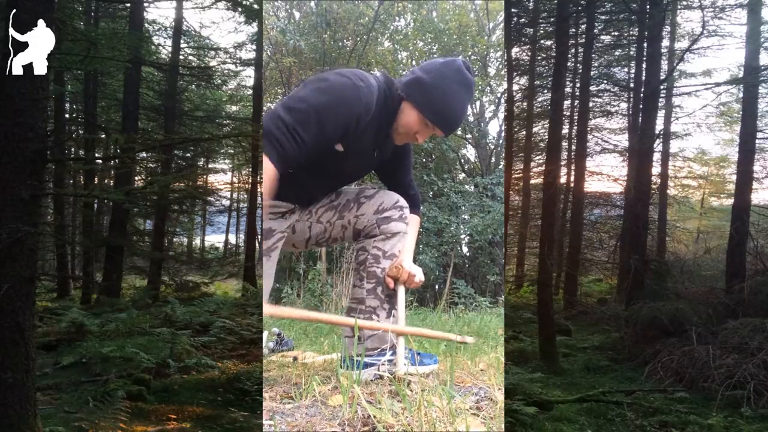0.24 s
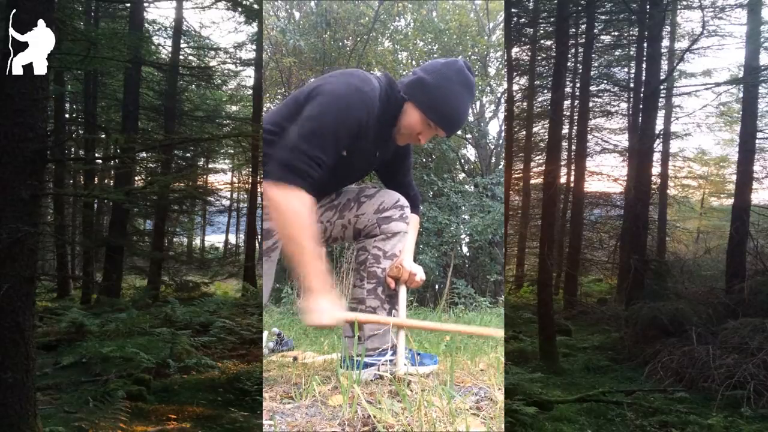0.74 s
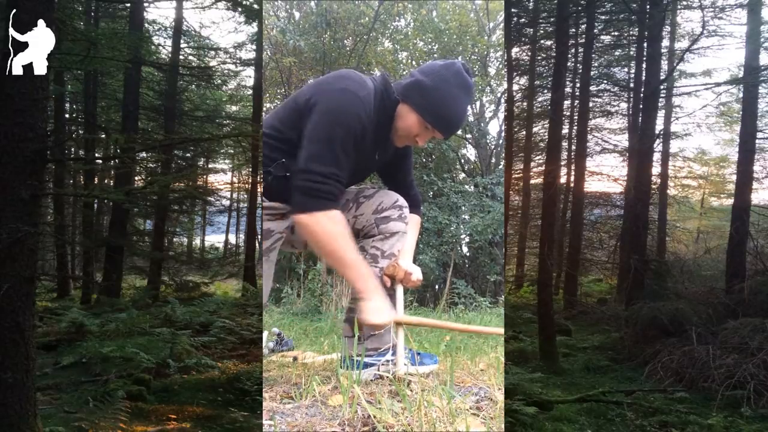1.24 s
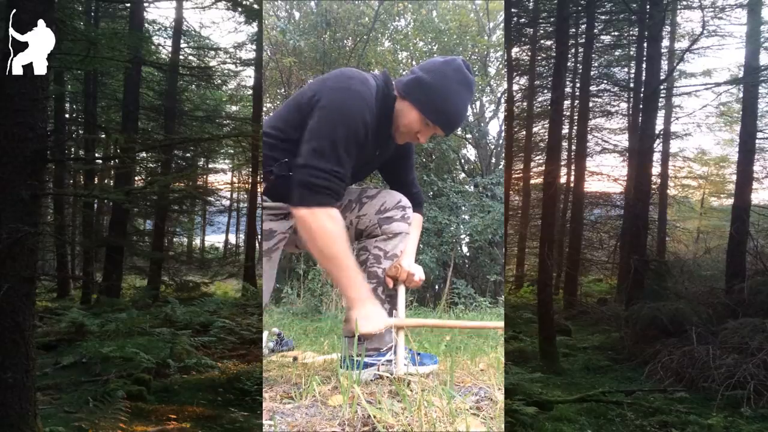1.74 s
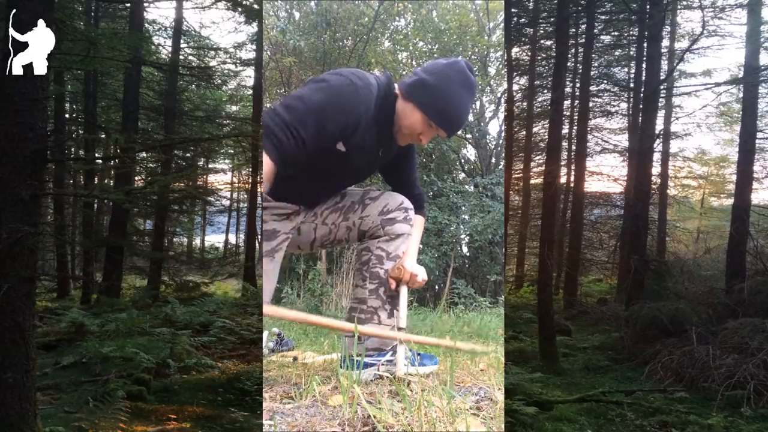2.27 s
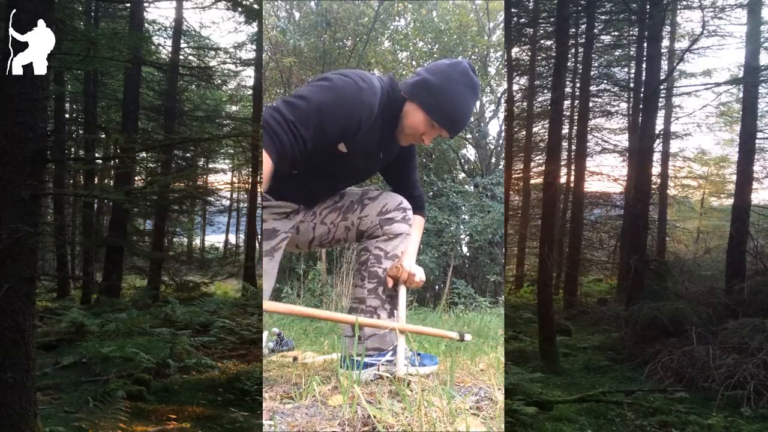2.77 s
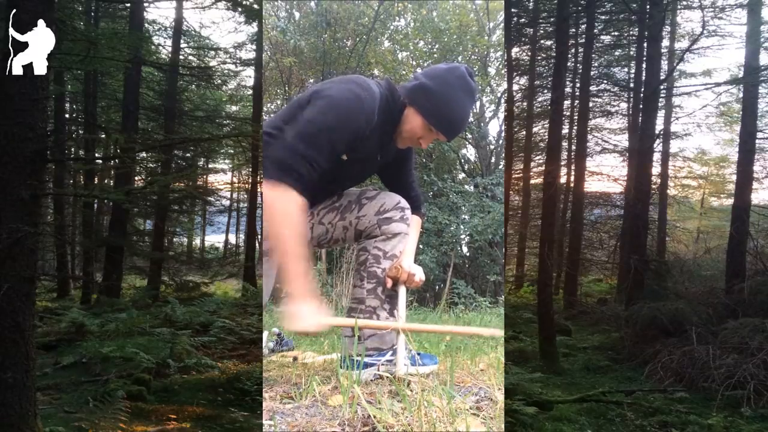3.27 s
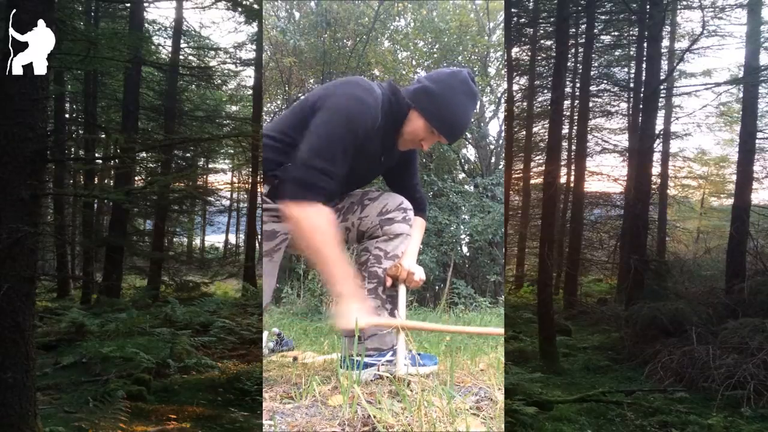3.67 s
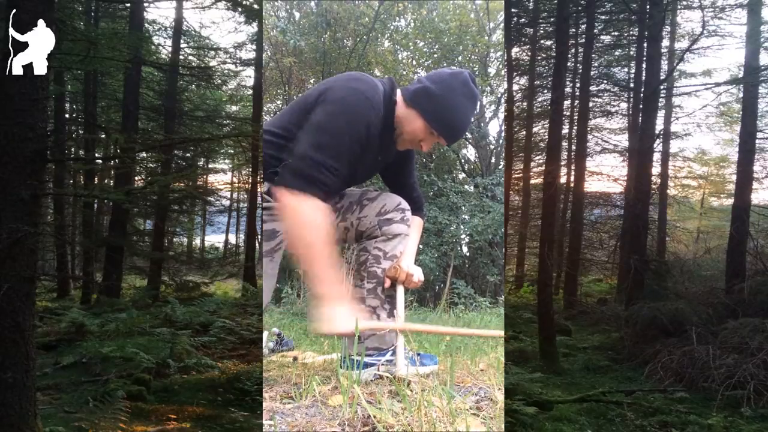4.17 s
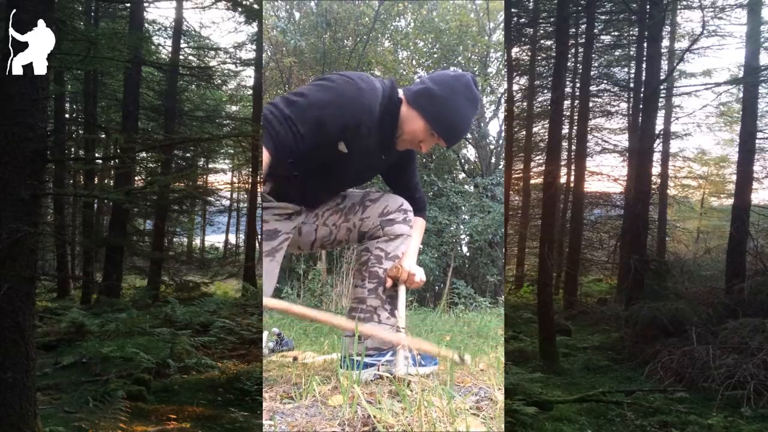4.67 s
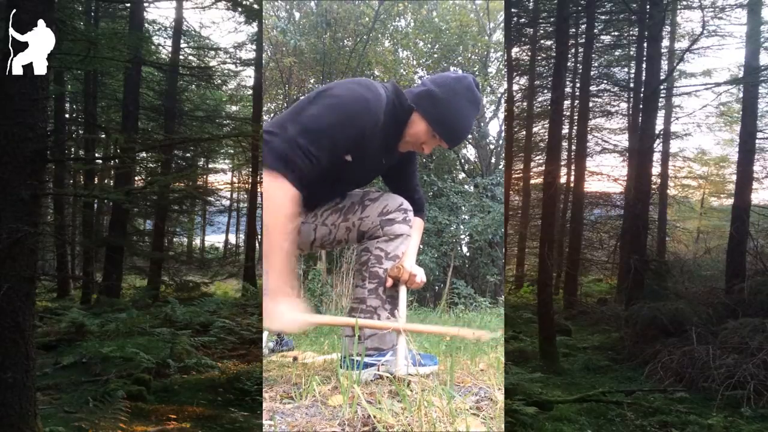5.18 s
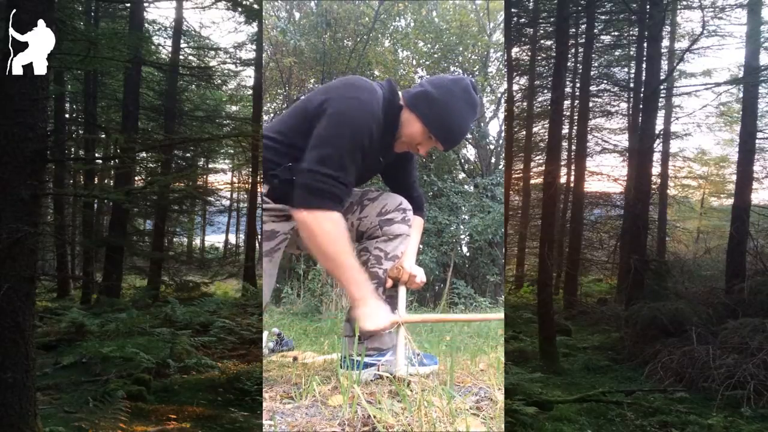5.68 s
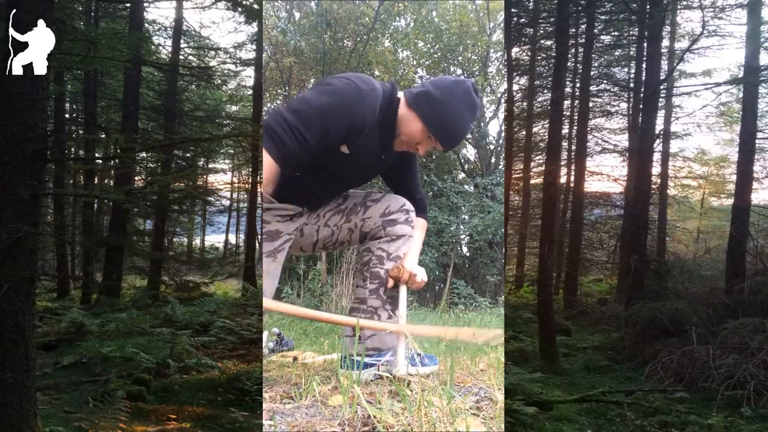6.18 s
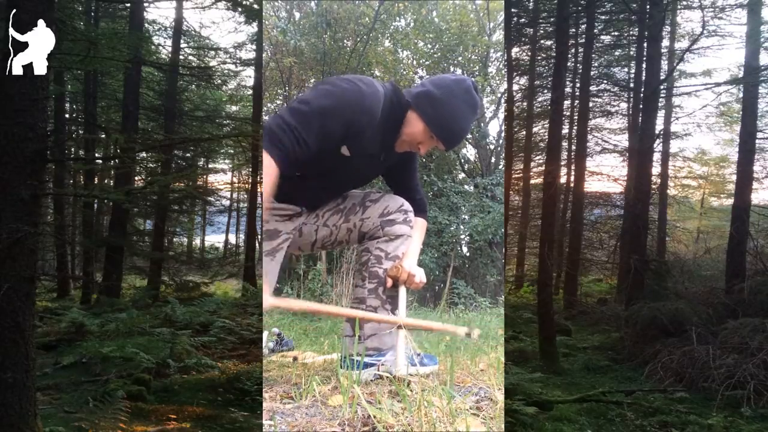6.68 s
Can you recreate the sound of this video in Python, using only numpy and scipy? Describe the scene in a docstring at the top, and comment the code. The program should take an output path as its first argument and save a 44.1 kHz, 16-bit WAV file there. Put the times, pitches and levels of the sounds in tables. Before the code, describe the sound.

Close outdoors, a bow drill saws about five strokes a second. Gritty wooden rasps alternate with short piercing squeals, some chattering, frequent in the first half. Dry knocks land mostly at the turns, with tiny cord ticks. Later the rasp grows stronger and squeals become rare. Trees return a brief bright echo over a faint airy wash and low hum.

```python
"""A bow drill in a forest clearing, over a faint hum. A lone squeal opens it, the tip grabbing a swinging
spindle. Then the bow saws to and fro five strokes a second: grit clicks rasp in the socket, and squeals near
1.9 kHz, some with chatter, come often until 3.8 s. Wood knocks ring, mostly at the turns; the cord gives puffs
of treble. Trees send back a short bright echo throughout. The background noise rises after 4 s, when squeals
are rarer; the last squeal comes at 6.1 s, and rasping and knocks carry on to the end."""
import sys
import numpy as np
from scipy import signal
from scipy.fft import rfft, irfft, next_fast_len
from scipy.io import wavfile
from scipy.ndimage import uniform_filter1d, minimum_filter1d

SR = 44100
rng = np.random.default_rng(int(sys.argv[2]) if len(sys.argv) > 2 else 0)


def store_wav(level_fs):
    """Save 16-bit WAV to argv[1]."""
    pcm = np.round(np.clip(np.atleast_2d(level_fs), -1, 1) * 32767)
    wavfile.write(sys.argv[1], SR, pcm.T.astype(np.int16))


def invert_db(x):
    """Field ratio 10**(x/20) for x, a level in decibels (scalar or array-like)."""
    u = np.asarray(x, float) / 20
    return 10 ** u


N = 305172  # length in samples
T = np.arange(N) / SR


def colour(x, points):
    """Shape a spectrum by (f/Hz, level/dB) points, joined by straight lines over log frequency."""
    hz, db = np.transpose(points)
    size = next_fast_len(len(x))
    f = np.arange(size // 2 + 1) * SR / size + 1
    gain = invert_db(np.interp(np.log(f), np.log(hz), db))
    return irfft(rfft(x, size) * gain, size)[:len(x)]


def unit(x):
    """Scale a sound to rms 1."""
    return x / np.sqrt(np.mean(x ** 2))


def walk(rate):
    """A random wandering: levels held 1 / rate s and smoothed twice; spread near 1."""
    k = int(SR / rate)
    held = np.repeat(rng.standard_normal(N // k + 1), k)
    return 1.345 * uniform_filter1d(uniform_filter1d(held, k), k)[:N]


def band(x, hz, width):
    """A resonance applied twice, so that little is left on either side of it; rms 1."""
    peak = signal.iirpeak(hz, hz / width, fs=SR)
    return unit(signal.lfilter(*peak, signal.lfilter(*peak, x)))


def shake(x):
    """A small board radiates little low sound."""
    return signal.sosfilt(signal.butter(6, 520, "high", fs=SR, output="sos"), x)


def add(out, s, sound):
    """Mix a sound in at s seconds."""
    i = int(s * SR)
    out[i:i + len(sound)] += sound[:len(out) - i]


# colour of the outdoor wash: (f/Hz, relative level/dB)
WASH_COLOUR = [(20, -57), (40, -13), (80, -18.5), (150, -17), (320, -25.5), (900, -23), (2500, -28.5),
               (6000, -42), (15000, -46)]
# loudness of the wash over time: (t/s, level/dB)
WASH_LEVEL = [(0, -58.5), (2, -59), (3.8, -55.5), (4.6, -49), (6.92, -50.5)]
# low distant tones: (f/Hz, level/dB before wavering)
HUM_TONES = [(65, -62), (97, -63)]


def air():
    """Faint outdoor wash of coloured noise, and a low hum of sines wavering in level and phase."""
    swell = invert_db(1.2 * walk(4))
    wash = unit(colour(rng.standard_normal(N), WASH_COLOUR)) * swell
    hum = np.zeros(N)
    for hz, db in HUM_TONES:
        waver_db, drift = 2 * walk(6), .8 * walk(4)
        hum += invert_db(db + waver_db) * np.sin(2 * np.pi * hz * T + drift)
    return invert_db(np.interp(T, *np.transpose(WASH_LEVEL))) * wash + hum


# colour of what the trees send back: (f/Hz, gain/dB)
TREE_COLOUR = [(300, 9), (1000, -20), (1900, -14.5), (3000, -8), (3750, 3.5), (4500, -6), (5100, -3),
               (5800, 2), (6800, -3), (8000, -1.5), (14000, -9.5)]
ECHO_DB, ECHO_T60_S, ECHO_FADE_IN_S = -21.5, 0.35, 0.0076


def trees(x):
    """Scattered trunks return a decaying, treble-rich echo: the sound convolved with fading noise."""
    t = T[:SR]
    tail = rng.standard_normal(SR) * 1000. ** (-t / ECHO_T60_S) * np.clip(t / ECHO_FADE_IN_S, 0, 1)
    tail = colour(tail / np.sqrt(np.sum(tail ** 2)), TREE_COLOUR)
    # fast random flutter blurs the echo of every tone into a breathy band
    fluttered = x * (1 + 1.3 * walk(900))
    return invert_db(ECHO_DB) * signal.fftconvolve(fluttered, tail)[:N]


# the cord creeps over the spindle in even runs:
# (t/s of loudest tick, level/dB before colour and boost, gap/ms, loss/dB per tick before it, and after it)
CREEPS = [(0.3208, -27.5, 13.4, 6.5, 7.1), (0.7503, -16.5, 14.4, 24, 15), (1.642, -22.5, 13.5, 30, 12),
          (2.836, -23, 14, 12, 30), (3.1955, -21.5, 11, 28, 4.9), (3.9619, -20.5, 10.2, 7.5, 3),
          (4.4102, -19, 11.6, 3, 9), (4.7741, -19.5, 9.8, 13, 4.5), (4.928, -22.5, 8.2, 14, 30),
          (4.9661, -24, 9, 6, 30), (5.1791, -11.5, 9.8, 4.5, 4), (5.9523, -14.5, 10.6, 4, 30),
          (6.3042, -28.5, 9.7, 30, 7.5), (6.5131, -19, 8.8, 7, 30)]
# lone ticks: (t/s, level/dB before colour and boost)
LONE_TICKS = [(0.1979, -33), (0.6652, -31), (1.0793, -33.5), (1.5126, -24), (1.5674, -15), (3.32, -18),
              (3.6063, -22.5), (3.6418, -27), (4.1524, -26), (5.2515, -28), (5.581, -29), (5.7243, -20),
              (6.1, -16.5), (6.704, -16.5), (6.7442, -22), (6.818, -27.5), (6.8816, -21)]
# colour of every tick: (f/Hz, gain/dB before the boost)
TICK_COLOUR = [(1500, -14.5), (3500, -9), (5800, -3.5), (7500, -13.5), (10000, -29.5), (16000, -20)]


def cord():
    """Puffs of treble noise that peak after 0.6 ms: runs, lone ticks and faint ones at random."""
    out = np.zeros(N)
    ticks = []
    for s, db, gap_ms, before, after in CREEPS:
        for k in range(-3, 4):
            loss_db = abs(k) * (before if k < 0 else after)
            ticks.append((s + k * gap_ms / 1000, db - loss_db))
    ticks += LONE_TICKS
    # faint ticks, 0 to 8 dB above the faintest
    ticks += [(s * N / SR, -42 + 8 * size) for s, size in rng.random((40, 2))]
    rise = T[:200] / .0006
    puffs = rng.standard_normal((len(ticks), 200)) * rise * np.exp(1 - rise)
    for (s, db), puff in zip(ticks, puffs):
        add(out, s, invert_db(db) * puff)
    return invert_db(7.5) * colour(out, TICK_COLOUR)


# modes of the struck bow and spindle: (f/Hz before detuning, level/dB before each blow's tilt, t60/s)
BODY = [(168.5, -5, 0.04), (416.6, -1.5, 0.044), (580, -8, 0.024), (719, -1, 0.013), (974, -5.5, 0.015),
        (1341, -1.5, 0.017), (1870, -2.5, 0.018), (2484, -3, 0.011), (3910, 3.5, 0.0046),
        (4815, 1.5, 0.006), (5930, -5.5, 0.01), (7670, -10.5, 0.0043), (10430, -17, 0.006)]


def ring(db, chance):
    """One blow into the modes of the wood, peak 1; where it lands sets each one's strength, pitch and phase."""
    t = T[:4096]
    spot_db, detune, phase = (chance * [2.5, .03, 1.2]).T
    hz, mode_db, t60 = np.transpose(BODY)[:, :, None]
    swing = np.sin(2 * np.pi * hz * (1 + detune[:, None]) * t + phase[:, None])
    fading = swing * 1000. ** (-t / t60)
    y = invert_db(mode_db[:, 0] + db + spot_db) @ fading
    # the contact takes a moment to build
    y = y * (1 - np.exp(-(t / .0004) ** 2))
    return y / np.abs(y).max()


# wood on wood, mostly at the turns: (t/s, peak level/dB before the bass cut, thud/dB, snap/dB)
KNOCKS = [(0.2209, -9, -26, 0), (0.3138, -28, 4, -18), (0.3951, -17.5, -5, -0.5), (0.6796, -9.5, -12.5, 0),
          (0.7523, -10.5, -5, -28), (0.95, -25.5, -40, -11), (1.1383, -16.5, -16, 2),
          (1.1832, -11, -16, -17), (1.2323, -10, -10, -2.5), (1.253, -10.5, -17, -1), (1.289, -16, -8, -3),
          (1.645, -29, -8, -10), (1.99, -16.5, -24, 2), (2.066, -6.5, -18.5, -0.5), (2.473, -20, -4, -4),
          (2.5181, -28, -1, -5), (2.8931, -23.5, -1.5, -2), (3.2309, 0, -23, 5), (3.3051, -7.5, -15, -15),
          (3.5987, -2.5, -21, 7), (3.6577, -23.5, -12, -1), (3.7136, -13, -16.5, -5.5),
          (3.997, -0.5, -22, 2), (4.07, -1, -15, 2.5), (4.1181, -0.5, -28, -0.5), (4.1231, -5.5, -5, 7.5),
          (4.4661, -29.5, 8, -8), (4.5135, -18, -2.5, -11), (4.6457, -28, -26, -5),
          (4.8446, -13, -5.5, -10), (5.0294, -26, -14, -9), (5.2021, -0.5, -16, 1),
          (5.2585, -9.5, -2.5, -4), (5.597, 1.5, -15.5, 3), (5.641, -15.5, -2.5, -4),
          (5.6843, -21, -3, -11), (5.966, -4, -15.5, -5.5), (6.0202, -27.5, 0, -1),
          (6.071, -19.5, -1, -5.5), (6.2, -27, -18, -13), (6.3644, -8.5, -20, -2.5), (6.4111, -8, -13, -1),
          (6.471, -17.5, 15, 4), (6.5174, -8, -13, -18), (6.6075, -22.5, -6, -19), (6.7622, 1, -16.5, -10),
          (6.8141, -16, -5, -13)]


def knocks():
    """Every blow rings the same modes of the wood, with its own weight, snap and edge."""
    out = np.zeros(N)
    chance = rng.standard_normal((len(KNOCKS), len(BODY), 3))
    octaves = np.log2(np.array(BODY)[:, 0] / 1000)  # above 1 kHz
    for (s, db, thud_db, snap_db), c in zip(KNOCKS, chance):
        edge_db = -7 + 0.4 * snap_db  # the top modes follow the snap
        tilt = np.interp(octaves, [-1.2, -.4, .4, .9, 1.4, 1.9], [thud_db, 0, 0, snap_db, snap_db, edge_db])
        add(out, s, invert_db(db) * ring(tilt, c))
    # thin sticks move little air in the deep bass
    return signal.sosfilt(signal.butter(2, 140, "high", fs=SR, output="sos"), out)


def resonate(x, peaks):
    """Sum of (f/Hz, width/Hz, level/dB) resonances, each coming and going in patches of its own."""
    out = np.zeros(N)
    for hz, width, db in peaks:
        patch_db = 3.5 * np.tanh(walk(150))
        out += invert_db(db + patch_db) * band(x, hz, width)
    return out


def arch(t, start, end, rise, fall):
    """Smooth rise to 1 about start and fall about end."""
    return .25 * (1 + np.tanh((t - start) / rise / 2)) * (1 - np.tanh((t - end) / fall / 2))


# bow strokes at full speed, pull and push in turn: (start t/s, end t/s, rasp level/dB before flutter)
STROKES = [(0.0, 0.029, -45.5), (0.155, 0.249, -39.5), (0.362, 0.455, -43), (0.6, 0.704, -37.5),
           (0.781, 0.895, -45.5), (1.022, 1.128, -45.5), (1.225, 1.325, -36.5), (1.466, 1.572, -30),
           (1.701, 1.784, -45.5), (1.929, 1.998, -35.5), (2.111, 2.195, -47), (2.318, 2.416, -31.5),
           (2.515, 2.63, -47.5), (2.739, 2.836, -40.5), (2.946, 3.024, -47), (3.15, 3.241, -31.5),
           (3.338, 3.445, -38.5), (3.538, 3.623, -32), (3.708, 3.804, -41), (3.925, 4.008, -29.5),
           (4.083, 4.211, -37.5), (4.313, 4.413, -28), (4.516, 4.605, -34), (4.705, 4.788, -28),
           (4.899, 4.985, -37), (5.103, 5.209, -26), (5.291, 5.387, -37.5), (5.486, 5.59, -29),
           (5.679, 5.767, -37), (5.86, 5.979, -30), (6.063, 6.159, -40), (6.253, 6.364, -30),
           (6.453, 6.549, -33.5), (6.651, 6.744, -28.5), (6.856, 6.94, -34)]
# board under the rubbing tip: (f/Hz, width/Hz of one filter pass, relative level/dB)
BOARD = [(802, 145, 16), (947, 405, 29.5), (1193, 220, 20), (1510, 240, 20), (2480, 370, 11.5)]
# how bite and hiss vary from stroke to stroke, the bite pitch drifting lower: (t/s, bite level/dB on the pull,
# on the push, bite f/Hz on the pull, dry hiss level/dB on the pull); bite: the squeal mode under the rasp
BITE_AND_HISS = [(0, -29.5, -40, 2160, -46), (1.05, -29.5, -41.5, 2150, -50.5),
                 (1.6, -33, -24.5, 2040, -43), (2.8, -34, -30.5, 2060, -55), (3.3, -29, -31.5, 2020, -45),
                 (3.6, -28.5, -29, 1936, -53), (4.2, -30, -30, 1930, -48), (4.8, -31, -32, 1887, -43),
                 (5.3, -31, -37, 1870, -44.5), (5.6, -31.5, -37, 1870, -50), (6.1, -31.5, -36.5, 1892, -48),
                 (6.4, -30, -37.5, 1870, -48.5), (6.9, -35, -40, 1904, -43)]
# a higher board mode on the pull: (f/Hz, width/Hz of one filter pass, level/dB over the rasp)
PULL_RING = (1293, 290, -4.5)
# colour of the dry hiss, and of the grit in the squeal: (f/Hz, relative level/dB)
HISS_COLOUR = [(1500, -2.5), (3000, 6), (6000, 10), (8500, 1), (12000, -0.5), (15000, -4)]
RISE_S, FALL_S, HISS_EDGE_S = 0.013, 0.0069, 0.017  # how gradually a stroke starts and stops
BITE_WIDTH_HZ, PUSH_HZ, PUSH_HISS_DB = 440, -93, -4  # width of one filter pass; shifts on the push


def rasp():
    """Dense uneven grit clicks ring the board in patches as the spindle turns; every stroke swells and stops."""
    clicks = (rng.random(N) < 3000 / SR) * rng.standard_normal(N)  # about 3000 a second
    grit = clicks * invert_db(1.8 * rng.exponential(size=N))
    grit = grit * invert_db(3 * np.tanh(walk(110)))
    level, hiss_level, bite = np.zeros((3, N))
    course = np.array(BITE_AND_HISS).T
    for k, (start, end, db) in enumerate(STROKES):
        push = k % 2
        pull_db, push_db, bite_hz, hiss_db = (np.interp(start, course[0], v) for v in course[1:])
        near = slice(max(int((start - .15) * SR), 0), int((end + .15) * SR))
        speed = arch(T[near], start, end, RISE_S, FALL_S)
        level[near] += invert_db(db) * speed
        hiss_speed = arch(T[near], start, end, HISS_EDGE_S, HISS_EDGE_S)
        hiss_level[near] += invert_db(hiss_db + push * PUSH_HISS_DB) * hiss_speed
        bite_db = push_db if push else pull_db
        bite[near] += invert_db(bite_db) * speed * band(grit[near], bite_hz + push * PUSH_HZ, BITE_WIDTH_HZ)
        if not push:
            hz, width, over_db = PULL_RING
            bite[near] += invert_db(db + over_db) * speed * band(grit[near], hz, width)
    flicker = invert_db(2.5 * walk(150) + 1.5 * walk(30))
    hiss = unit(colour(rng.standard_normal(N) * flicker, HISS_COLOUR))
    board = unit(shake(resonate(grit, BOARD))) * invert_db(3.5 * np.tanh(walk(90)))
    return level * board + bite * invert_db(6.34 * np.tanh(walk(120))) + hiss_level * hiss


def pushing(t):
    """1 during a push of the bow, 0 during a pull."""
    return np.searchsorted(np.array(STROKES)[1:, 0], t) % 2


# the tip grabs again and again within a stroke, before scatter: (first grab t/s, last grab t/s, grabs,
# level/dB, change/dB from first to last, change/dB mid-squeal, lowest f/Hz)
SQUEALS = [(0.0224, 0.0222, 1, -2, 0, 0, 1911), (0.4169, 0.4503, 4, -4.5, -9, 3, 1843),
           (0.825, 0.8812, 6, -2.5, -4, 2, 1885), (1.2904, 1.3097, 3, -7, 8, 5.5, 2104),
           (1.5234, 1.5511, 4, -4.5, -4.5, -3, 1898), (1.718, 1.7762, 6, -2, -2.5, -1.5, 1838),
           (1.952, 1.9764, 3, -3, -1, -0.5, 1900), (2.1377, 2.1753, 4, -4, -5.5, 1.5, 1938),
           (2.349, 2.3697, 3, -1.5, 0, 0.5, 1737), (2.544, 2.6153, 7, -3, -5, -0.5, 1856),
           (2.7663, 2.806, 4, -8, 11, 5, 2001), (2.96, 3.0093, 6, -5, 5.5, 0, 1945),
           (3.3761, 3.4386, 6, -3, -1, 0, 1800), (3.578, 3.6017, 3, -10, -2, 8, 1818),
           (3.7567, 3.782, 3, -1.5, 0, -7, 1870), (4.168, 4.2124, 3, -8.5, -9, -1, 1880),
           (4.54, 4.585, 3, -18.5, 0, 11.5, 1850), (5.354, 5.353, 1, -2.5, 0, 0, 1830),
           (5.7317, 5.7317, 1, -2, 0, 0, 1844), (6.0972, 6.1405, 4, -7.5, 5.5, -2.5, 1870)]
# random spread from grab to grab: [level/dB, f/Hz, octave/dB, glide/Hz per ms]
GRAB_SCATTER = [1.2, 25, 2, 10]
# a grab swells for a share of the gap to the next: (pull, push); the pitch sags on the pull, rises on the push
SWELL_SHARE, GLIDE_HZ_PER_MS = (.3, .27), (-10, 25.3)
LONE_MS, LONGEST_MS, FIRST_LONGER, LAST_LONGER = 3.6, 4.5, 1.1, 1.2  # swell widths; factors at the ends
START_HZ, END_HZ = 109.5, 30.11  # first and last grab above the lowest pitch
# the octave grows as the pitch sags and the grab strengthens
OCTAVE_DB, OCTAVE_DB_PER_HZ, MID_BRIGHT_DB, OCTAVE_PER_DB = -15, -0.0217, 3, 0.52
LEAD_S, LEAD_DB, LEAD_HZ, LEAD_MS = .014, -19, 269.7, 4.5  # whistle ahead of a squeal


def grabs():
    """Every grab of every squeal: (t/s, level/dB, swell width/ms, f/Hz, glide/Hz per ms, octave/dB)."""
    rows = []
    chance = rng.standard_normal((len(SQUEALS), 8, 4)) * GRAB_SCATTER
    for (first, last, count, db, change_db, mid_db, low), c in zip(SQUEALS, chance):
        count = int(round(count))
        several = count > 1
        c, push = c[:count], int(pushing(np.array(first)))
        place = np.linspace(-1, 1, count) * several  # -1 first grab, 1 last grab
        width_ms = SWELL_SHARE[push] * 1000 * (last - first) / (count - 1) if several else LONE_MS
        longer = np.select([place == -1, place == 1], [FIRST_LONGER, LAST_LONGER], 1)
        width_ms = min(width_ms, LONGEST_MS) * longer
        # the pitch sags mid-squeal, where the tip bears hardest
        mid = (1 - place ** 2) * several
        pitch = low + np.where(place < 0, START_HZ, END_HZ) * place ** 2
        level_db = db + change_db * place / 2 + mid_db * mid
        octave_db = OCTAVE_DB + OCTAVE_DB_PER_HZ * (pitch - 1900) + MID_BRIGHT_DB * mid
        octave_db = octave_db + OCTAVE_PER_DB * level_db
        rows += zip(np.linspace(first, last, count), level_db + c[:, 0], width_ms, pitch + c[:, 1],
                    GLIDE_HZ_PER_MS[push] + c[:, 3], octave_db + c[:, 2])
        # on the pull, a faint high whistle slides down into a squeal of several grabs
        if several and not push:
            rows.append((first - LEAD_S, level_db[0] + LEAD_DB, LEAD_MS, low + LEAD_HZ,
                         GLIDE_HZ_PER_MS[0], OCTAVE_DB - 4))
    return rows


# overtones above the octave: (multiple of the pitch, level/dB relative to the octave)
OVERTONES = [(3, -6), (4, -15.5), (5, -25.5), (6, -24.5), (7, -30.5), (8, -53)]
# the tip skips swings before it slips: (start t/s, end t/s, swings per slip,
# level/dB before the pulse's own gain, unevenness 0-1)
CHATTER = [(1.524, 1.542, 1.22, -15, 0.11), (1.537, 1.565, 3.05, -6.5, 0.19),
           (1.936, 1.989, 1.91, -22, 0.03), (2.352, 2.38, 2.03, -11.5, 0.21),
           (3.563, 3.605, 2, -16.5, 0.24), (2.774, 2.814, 1.9, -38, 0.09), (6.091, 6.126, 2.76, -24, 0.27)]


def squeal():
    """Stick-slip locked to a mode of the spindle: a swinging tone with overtones, and skipped slips."""
    # tiny starting values keep the weighted averages defined in silence
    swell, hz, bright_db = np.zeros(N) + 1e-9, np.zeros(N) + 1900e-9, np.zeros(N) - 20e-9
    for s, db, width_ms, pitch, glide, octave_db in grabs():
        near = slice(max(int((s - .05) * SR), 0), int((s + 0.036) * SR))
        ms = (T[near] - s) * 1000
        bump = invert_db(db) * np.exp(-.5 * np.abs(ms / width_ms) ** 2.1)
        swell[near] += bump
        hz[near] += bump * np.clip(pitch + glide * np.clip(ms, -width_ms, width_ms), 1500, 2400)
        bright_db[near] += bump * octave_db
    waver = 1 + .018 * walk(600) + .011 * walk(260)
    hz = hz / swell * waver
    # overtones grow with the swing, and as the pitch sags
    bright_db = bright_db / swell + 3 + 14 * np.log10(swell + .02) - 150 * (waver - 1)
    phase = 2 * np.pi * np.cumsum(hz) / SR
    tone = np.sin(phase)
    # the sharper the release, the stronger every overtone; each wavers by itself
    for k, db in [(1.98, 0)] + OVERTONES:
        patchy_db = 3 * walk(260) + 2 * walk(900)
        slur = .25 * k * walk(200) + .1 * k * walk(1200)
        tone += invert_db(bright_db + db + patchy_db) * np.cos(k * phase + slur)
    # grit between the overtones
    grit = unit(colour(rng.standard_normal(N), HISS_COLOUR))
    tone += invert_db(bright_db - 15 + 0.9 * walk(300)) * grit
    for start, end, swings, db, uneven in CHATTER:
        gate = np.interp(T, [start - .003, start, end, end + 0.0075], [0, 1, 1, 0])
        slow = phase / swings + 4 * uneven * walk(400)
        slips = np.exp(3.8 * (np.cos(slow) - 1)) * invert_db(2.2 * uneven * walk(700))
        pulses = slips * (3 + 8.1 * np.sin(phase) + 5 * uneven * walk(9000))
        tone += gate * invert_db(db) * shake(pulses)
    return swell * invert_db(1.2 * walk(350)) * tone


def scene():
    """The drill close by, its echo and the air; the piercing squeal carries furthest among the trees."""
    tone = squeal()
    wood = rasp() + knocks() + cord()
    squeal_send = invert_db(np.array([-1.5, -2])[pushing(T)])  # dB on the pull, on the push
    echo = trees(tone * squeal_send + invert_db(-4) * wood)
    return (tone + wood + echo + air())[None]


def band_limit(x):
    """A steep low-pass at the top of the band."""
    return signal.sosfilt(signal.butter(12, 16460, fs=SR, output="sos"), x)


def record(dry):
    """The microphone drops deep bass and top; a quick limiter holds the peaks under full scale."""
    x = signal.sosfilt(signal.butter(2, 60, "high", fs=SR, output="sos"), dry)
    x = signal.sosfilt(signal.ellip(8, .5, 40, 15200, fs=SR, output="sos"), x)
    room = minimum_filter1d(np.minimum(1, 1 / (np.abs(x) + 1e-9)), size=129)
    mix = x * uniform_filter1d(room, size=65)
    return band_limit(mix)


dry = scene()
out = record(dry)
store_wav(out)
```